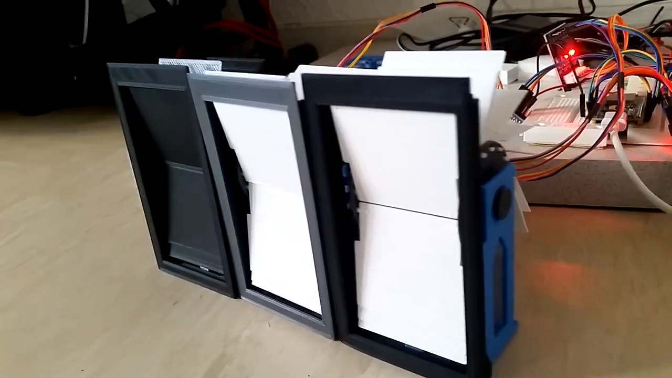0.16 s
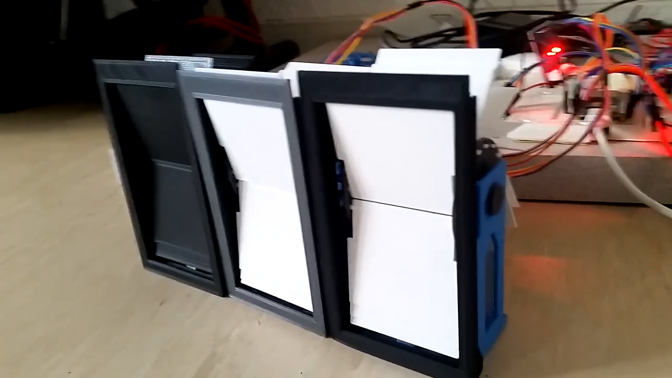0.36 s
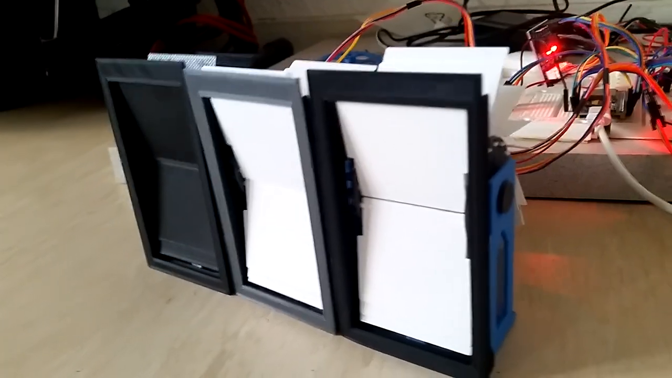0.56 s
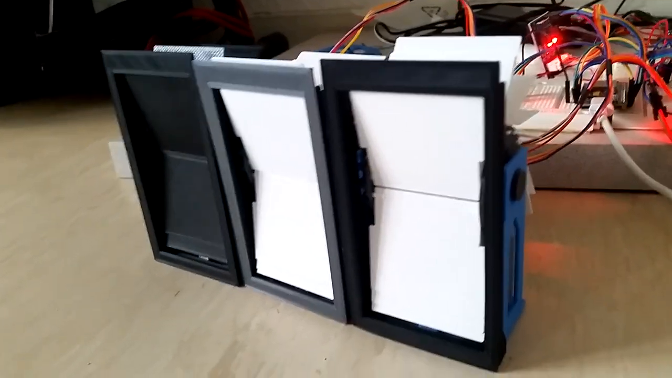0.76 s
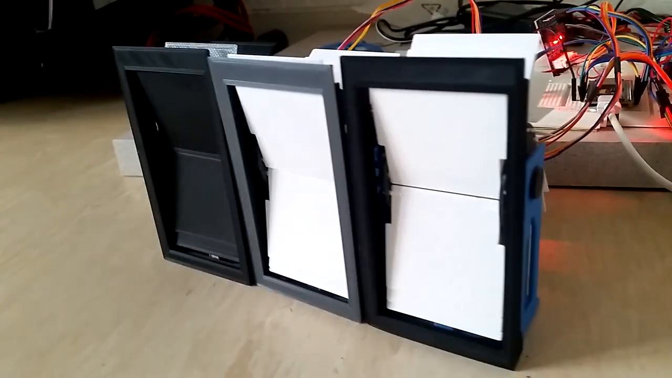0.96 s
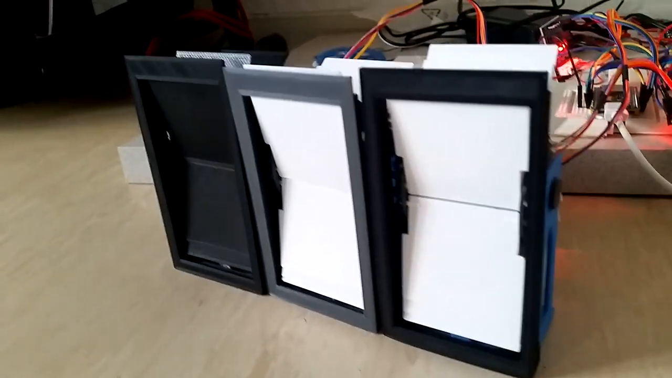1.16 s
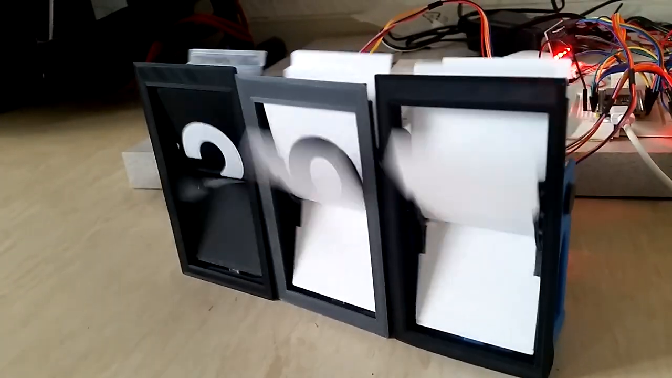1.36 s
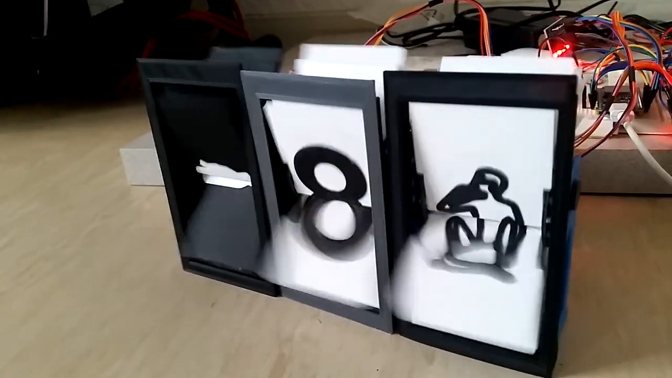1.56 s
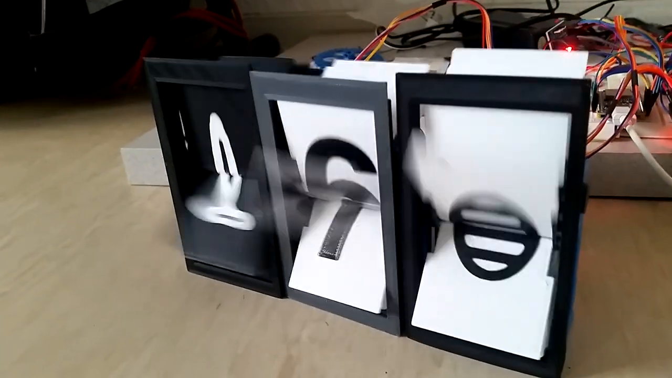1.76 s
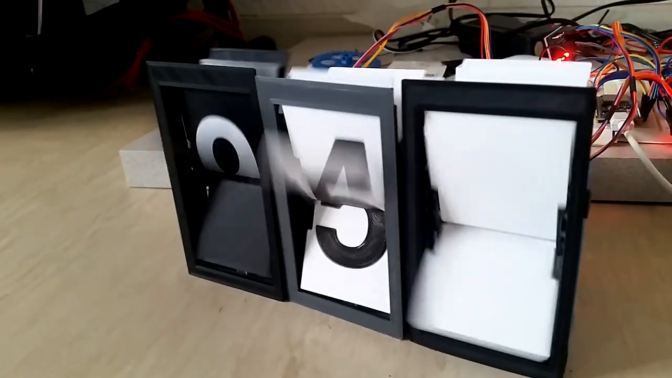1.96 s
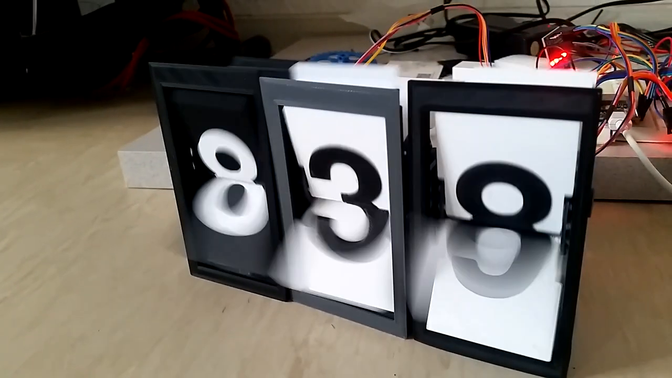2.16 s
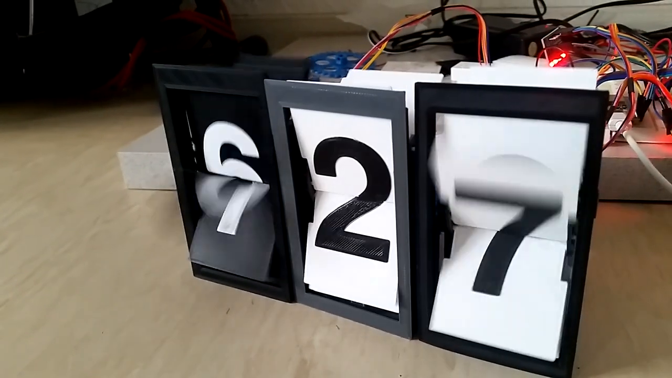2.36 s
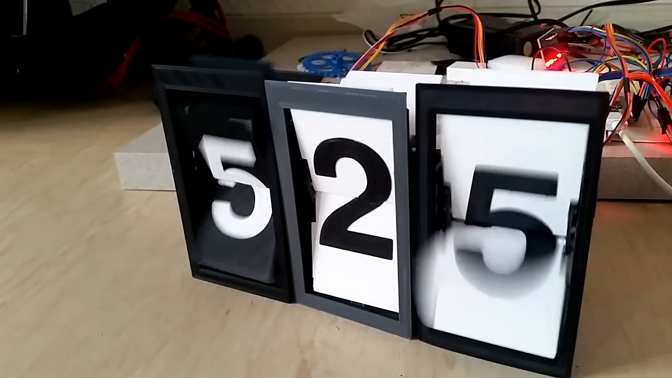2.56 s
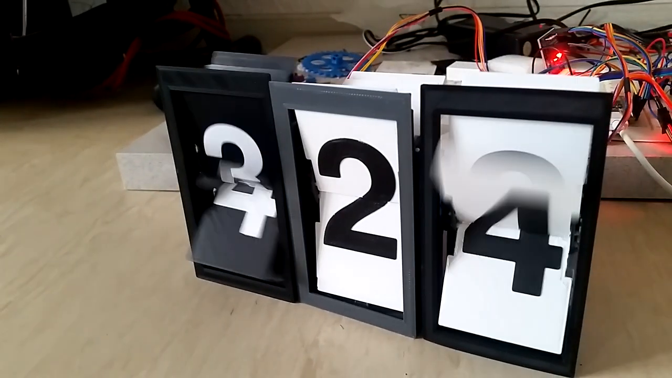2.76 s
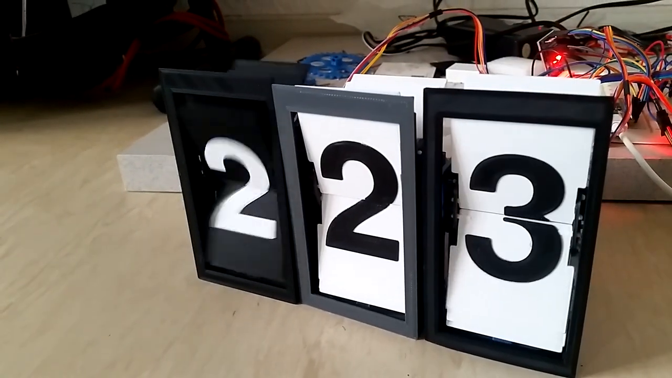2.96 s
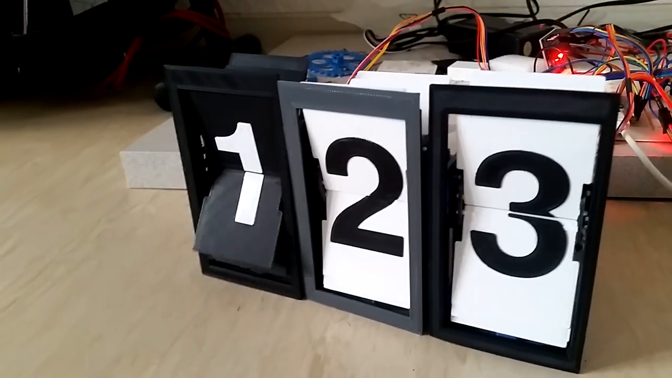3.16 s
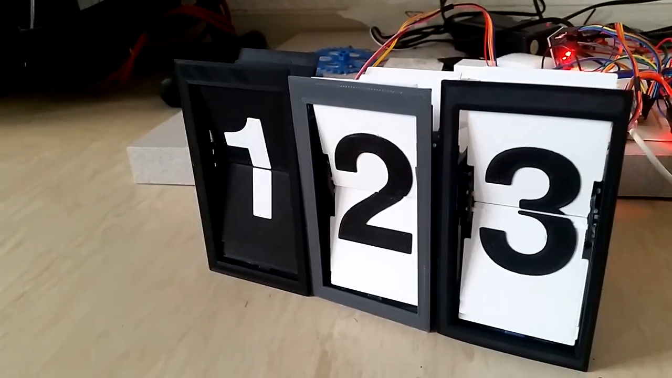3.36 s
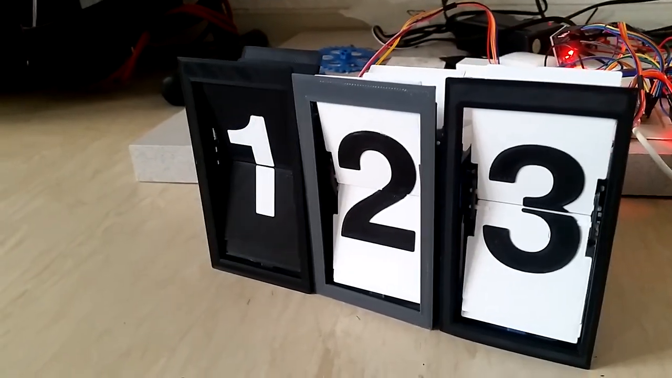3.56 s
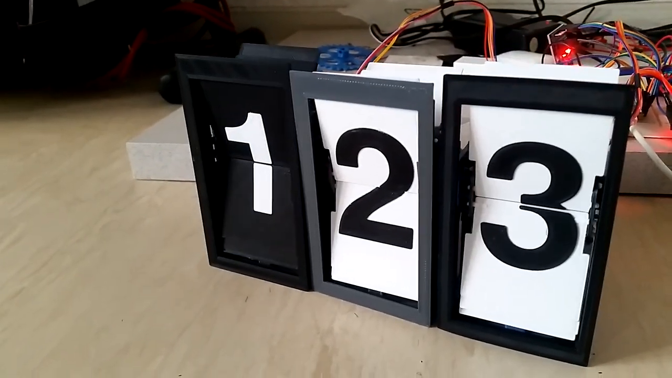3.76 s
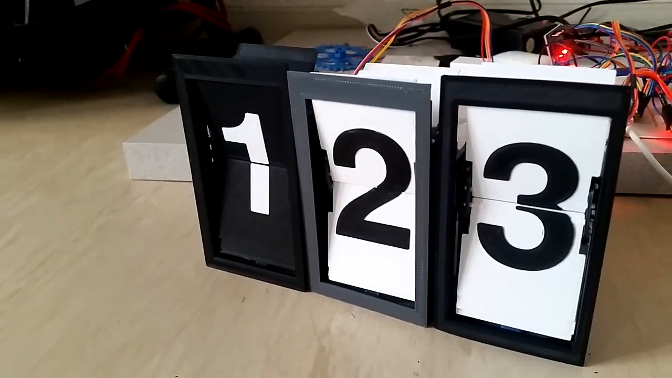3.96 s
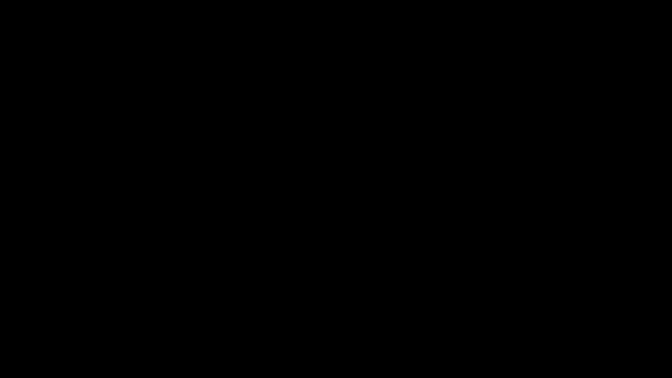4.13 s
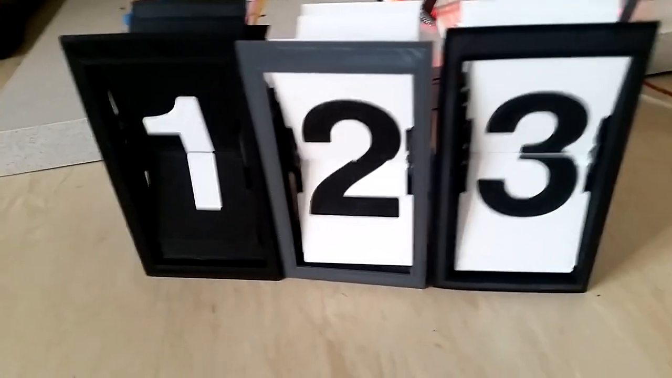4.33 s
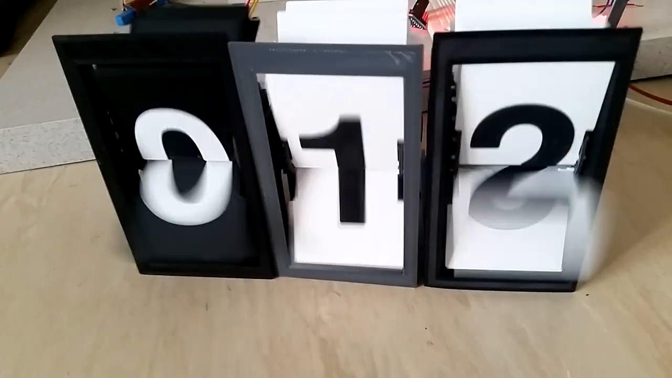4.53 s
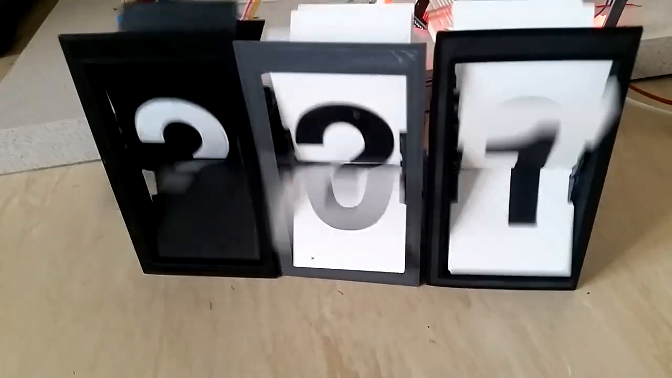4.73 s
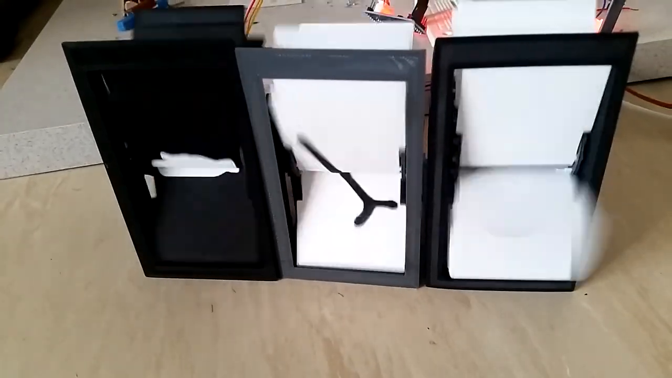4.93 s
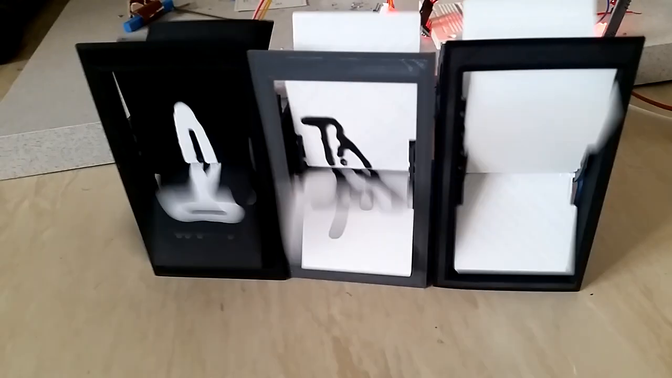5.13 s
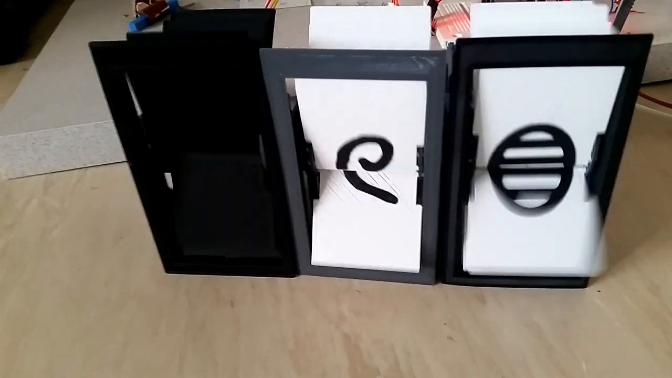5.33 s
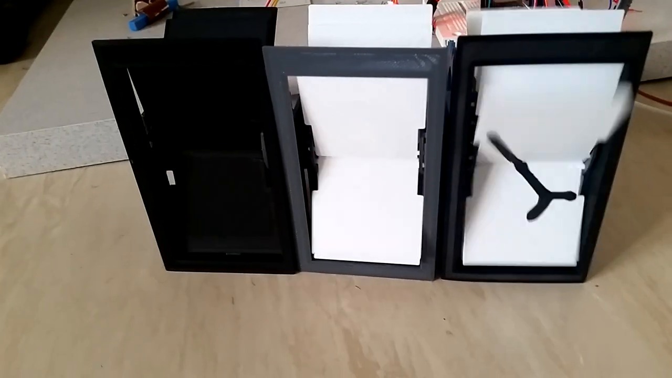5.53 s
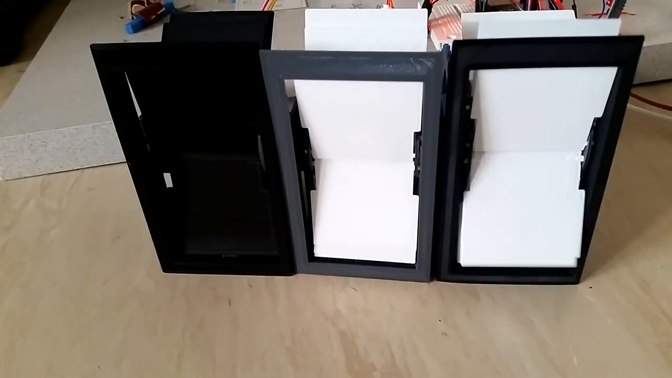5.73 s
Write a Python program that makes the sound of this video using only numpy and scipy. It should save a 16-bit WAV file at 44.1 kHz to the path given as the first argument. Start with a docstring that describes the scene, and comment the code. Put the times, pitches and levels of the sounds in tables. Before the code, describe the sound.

After a quiet low hum, small motor-driven display cards clatter down fast, thin out and stop, rest briefly, then clatter again.

```python
"""A low hum over faint rumble and hiss precedes three small split-flap modules, close by in a small room.
Their geared motors start together: filtered noise whirrs, and a moment later plastic cards land as bursts of tiny
contacts that excite resonances, rebound and chatter to rest, while loose cards rub and tick. The motors stop one
by one. The hum remains through a pause with faint touches and, near its end, a dull blip of four decaying tones;
then the cards run a second time. Diffuse, decaying noise reflections follow the sounds of the display."""
import sys
import numpy as np
from scipy import signal
from scipy.fft import rfft, irfft
from scipy.io import wavfile

SR = 44100
rng = np.random.default_rng(int(sys.argv[2]) if len(sys.argv) > 2 else 0)


def dump(signal):
    """Clip the signal to [-1, 1] and save it as 16-bit WAV at the path in sys.argv[1]."""
    limited = np.clip(np.atleast_2d(signal).T, -1, 1)
    pcm = np.round(limited * 32767).astype(np.int16)
    wavfile.write(sys.argv[1], SR, pcm)


N = 255339
T = np.arange(N) / SR  # time / s

# spectrum of rumble and hiss: f/Hz, relative density/dB per Hz
AIR_SPECTRUM = [(20, -8.5), (78, 1), (125, -13), (160, -12), (330, -23), (700, -29.5), (1400, -35.5),
                (2500, -39.5), (3500, -37), (6400, -40.5), (8000, -38), (13800, -38.5), (15100, -32)]
# side gain of the hiss, growing where each capsule hisses on its own: f/Hz, gain/dB
AIR_SIDE_GAIN = [(110, -21), (400, -8), (1200, -1.5), (6000, -0.5), (10000, -10)]
# course of the low hum: t/s, rms level/dB
HUM_LEVEL = [(0, -73), (.18, -55.5), (.56, -65.5), (.7, -56.5), (.86, -57.5), (.95, -65), (3.4, -67.5),
             (3.65, -60), (4.15, -66), (4.32, -64)]
# faint handling ticks while the display rests: t/s, level/dB, centre f/Hz
TOUCHES = [(1.152, -56, 8950), (3.667, -66, 1800), (3.851, -63, 4000), (4.256, -59.5, 9000)]
# inharmonic tones of the faint blip: f/Hz, relative level/dB, undamped t60/s
BLIP_TONES = [(520, 0, 0.082), (743, -1, .11), (887, -4, 0.083), (1130, -4, .14)]
# reverberation time of the room: f/Hz, t60/s
ROOM_T60 = [(100, 0.8), (500, 0.33), (14000, 0.2)]
# colour of the reflections: f/Hz, relative level/dB
ROOM_COLOUR = [(100, 4), (1500, 7.6), (5000, 0.6), (15000, 6.5)]
# side gain, the share of left-right difference: f/Hz, gain/dB
SIDE_GAIN = [(60, -30.5), (650, -24.5), (1400, -14), (1900, -10.5), (2900, -9.5), (4700, -8.5), (6200, -3),
             (8500, -5), (11500, -4.5)]
# resonances of flaps and frames: f/Hz, bandwidth/Hz, relative level/dB
FLAP_MODES = [(1803, 260, -11.5), (2470, 160, -7.5), (2830, 390, -6.5), (4250, 200, 2.5), (4080, 160, -5),
              (5136, 170, -.5), (5660, 170, -11), (8430, 220, -.5), (11100, 650, -8)]
# turns of the drums, three modules a run: start t/s, stop t/s, relative level/dB
TURNS = [(1.275, 2.416, 1), (1.276, 3.05, 1), (1.279, 3.19, -7), (4.347, 5.27, 2), (4.337, 5.52, -1.5),
         (4.336, 5.687, -9.5)]
# spectral weighting of the gear whirr: f/Hz, gain/dB
WHIRR_COLOUR = [(40, -19.5), (120, 5.5), (450, -1.5), (1200, 1), (2500, 4.5), (3400, 3.5), (4400, 4),
                (5600, 3.5), (7400, -3), (11800, -3.5), (15800, -7.5)]
# spectral weighting of the card rattle: f/Hz, gain/dB
RATTLE_COLOUR = [(40, -20.5), (120, -4), (300, 0), (1200, -0.5), (2200, 0.5), (5500, 8), (7500, 2),
                 (15800, -7.5)]
# spectral weighting of a slap: f/Hz, gain/dB
SLAP_COLOUR = [(40, -6), (120, -4.5), (300, -8), (1300, -5), (2600, 0.5), (3500, -1), (5000, 2.5),
               (7200, -1.5), (12500, -1), (15800, -4)]
# clearest ticks of flaps slipping off their catch or settling: t/s, level before trim/dB
TICKS = [(1.301, -34), (1.3753, -26), (1.5216, -27), (1.5688, -24), (1.6213, -17.5), (1.738, -27),
         (1.7557, -23.5), (1.7818, -21), (1.8556, -17), (1.906, -18), (1.929, -25), (1.9867, -22.5),
         (2.0015, -20.5), (2.0824, -26), (2.1576, -20.5), (2.2126, -24.5), (2.2824, -22.5), (2.331, -32),
         (2.3541, -26), (2.372, -17), (2.4705, -26.5), (2.523, -28), (2.5991, -25.5), (2.6145, -25),
         (2.6596, -25), (2.6776, -22.5), (2.716, -30), (2.743, -23.5), (2.7806, -30), (2.852, -25),
         (2.8948, -25), (2.904, -23), (2.9556, -20), (3.023, -33), (3.1524, -29.5), (3.2856, -29.5),
         (3.3212, -29), (3.326, -35), (3.3904, -51), (3.4124, -48.5), (4.385, -31), (4.4258, -23.5),
         (4.472, -31), (4.507, -33.5), (4.5496, -23), (4.6396, -24.5), (4.6671, -20), (4.7594, -21),
         (4.807, -30), (4.899, -23.5), (4.9115, -24), (4.926, -21.5), (4.9937, -24), (5.039, -36),
         (5.061, -29), (5.0694, -17), (5.1166, -35), (5.234, -26), (5.4107, -28), (5.4216, -27),
         (5.4579, -23.5), (5.4815, -24), (5.508, -24), (5.6321, -34), (5.6563, -24), (5.7558, -32.5),
         (5.783, -46)]
# landings: t/s, level before trim/dB, body below 3.3 kHz/dB, snap above 7 kHz/dB, chatter decay/s,
# lean from the 4.2 kHz to the 5.2 kHz ring/dB; body and snap are relative to the band between
LANDINGS = [(1.509, -17, -5, -3.5, 0.004, -3), (1.534, -15.5, -2.5, -0.5, .003, -7),
            (1.554, -12, -11, -2, 0.0037, 9), (1.6359, -13, -6, 2, 0.0066, 6),
            (1.6634, -13, -8, 2, 0.004, -3), (1.6743, -11.5, -3.5, 10, 0.0033, -4),
            (1.769, -13, -7, -6, 0.0032, -7), (1.7916, -12.5, -10, -5, 0.0029, 5),
            (1.799, -14, -11.5, -2.5, .0022, -12), (1.8693, -10.5, -7, 4, 0.0082, -6),
            (1.912, -12, -5.5, 3, 0.007, -8), (1.9503, -11, -14.5, -1.5, 0.0034, -1),
            (2.0276, -15, -3.5, 3, 0.0064, -1), (2.0439, -11.5, -11, -5, .0057, 1),
            (2.0692, -15, -8.5, -3.5, 0.0017, 3), (2.123, -16, -4.5, 7, 0.0025, 1),
            (2.1334, -11.5, -6, 2.5, 0.0071, -2), (2.1844, -16, -7, -6, 0.0063, 1),
            (2.2625, -14.5, -6.5, -5, 0.0094, 3), (2.2692, -14.5, -2, 6.5, 0.0015, -1),
            (2.298, -14, -3, 6, 0.0038, -3), (2.3408, -20.5, -23, 4, 0.0017, 10),
            (2.3817, -15, -6.5, -3.5, 0.01, 4), (2.4035, -12.5, -3, 3, .0084, -1),
            (2.4236, -16.5, -6, 0.5, 0.0038, 1), (2.4983, -14.5, -6.5, 2.5, .007, -4),
            (2.555, -15, -2.5, -4, .0026, 2), (2.628, -16.5, -8.5, -7, .0077, 5),
            (2.6878, -13, -5, 3.5, 0.0038, -13), (2.7642, -16.5, -6.5, -1.5, 0.0043, 13),
            (2.8018, -20, -4, -2.5, .0026, 4), (2.917, -18, -8, -2.5, 0.012, 10),
            (2.946, -20.5, 1.5, 1, 0.002, 5), (3.0465, -13.5, -6, 2, .0055, -4),
            (3.1775, -18, -3, 2, 0.0048, 3), (4.56, -11, -11, 1, .003, -6),
            (4.5815, -17.5, -6, -6, 0.0047, 1), (4.6059, -14.5, -5, 3, .003, -4),
            (4.6896, -16.5, -2.5, 2, 0.0088, -16), (4.73, -13, -6.5, 6.5, 0.0023, -16),
            (4.736, -11.5, -4, 5, 0.0077, -1), (4.815, -11, -4, 6.5, 0.0063, -6),
            (4.825, -15.5, -2.5, 0.5, .002, -11), (4.868, -15, -8.5, -1.5, 0.0026, -5),
            (4.946, -10.5, -7.5, 0.5, 0.0084, -8), (4.9989, -11.5, -9, -2.2, 0.0049, 3),
            (5.08, -8, -8.5, 1.5, 0.0037, -5), (5.1554, -14.5, -9, -4.5, .0055, -11),
            (5.1811, -19, -1.5, 3, .009, 0), (5.197, -12.5, -6, -1.5, 0.0041, -11),
            (5.2072, -11, -11, -1, .004, 0), (5.2624, -12, -6.5, 4.5, 0.013, 1),
            (5.3325, -12, -10, 0.5, .0055, 2), (5.3463, -15.5, -1, 7, 0.0024, 1),
            (5.3814, -12, -10, -1, 0.002, 17), (5.5186, -13.5, -5.5, 2.5, 0.0025, 5),
            (5.5475, -12.5, -9.5, -2.5, 0.0041, -2), (5.6735, -16, -7.5, 0.7, 0.0044, -7)]

AIR_DB = -60
HUM_HZ = 106
BLIP_S, BLIP_DB = 4.219, -50
SPIN_UP_S, RUN_DOWN_S = 0.022, 0.029
# levels before the common trim of the drums; cards join in once the slack is taken up
GEARS_DB, CARDS_DB, SLACK_S = -44.5, -42, 0.21
# the gears strain once for every card: period, first peak after the start, swing either way
CARD_S, STRAIN_AT_S, STRAIN_DB = .129, .024, 2
# random catching and letting go of the rubbing: rms swing, fastest rate
CATCH_DB, CATCH_HZ = 2.5, 70
# swell of the other cards after a landing: level relative to its table level, decay
JOSTLE_DB, JOSTLE_S = -23, 0.019
# faint ticks of loose cards in each drum: rate, level before trim, greatest deviation
LOOSE_PER_S, LOOSE_DB, LOOSE_SPREAD_DB = 11, -37, 1
TICK_DECAY_S = 0.0034
DETUNE = .06  # greatest shift of a resonance, as a share of its frequency
LEAD_S = .012  # time before landing at which the sound of a hit begins
# single rebound: base delay, scale of its random share, strength
REBOUND_S, REBOUND_SPREAD, REBOUND_DB = .004, 0.38, -9.5
CUTOFF_HZ = 15750


def from_db(db):
    """Level law: decibels to amplitude gain."""
    return 10 ** (np.asarray(db) / 20)


def rms_one(x):
    """Normalization to unit root mean square."""
    return x / np.sqrt(np.mean(x ** 2) + 1e-20)


def at_hz(points, hz):
    """Interpolation of a spectrum along a logarithmic frequency axis."""
    f, value = np.transpose(points)
    return np.interp(np.log(np.maximum(hz, 1)), np.log(f), value)


def cut(x, hz, kind, order=2):
    """Band limitation by a Butterworth filter."""
    return signal.sosfilt(signal.butter(order, hz, kind, fs=SR, output="sos"), x)


def colour(x, spectrum, size=2048):
    """Minimum-phase filtering: the folded cepstrum gives a causal response with the given spectrum."""
    gain = from_db(at_hz(spectrum, np.arange(size // 2 + 1) * SR / size))
    cepstrum = irfft(np.log(gain))
    fold = np.r_[1, np.full(size // 2 - 1, 2), np.zeros(size // 2)]
    response = irfft(np.exp(rfft(cepstrum * fold)))
    return signal.fftconvolve(x, response[None], axes=-1)[:, :x.shape[-1]]


def add(out, s, sound):
    """Superposition: mix a sound in at time s."""
    i = int(np.clip(s * SR, 0, N - 1))
    out[:, i:i + sound.shape[1]] += sound[:, :N - i]


def background():
    """Stationary noise, shaped as rumble and hiss, with two tones of hum that waver in frequency together."""
    air = colour(rng.standard_normal((2, N)), AIR_SPECTRUM, size=8192)
    air[1:] = colour(air[1:], AIR_SIDE_GAIN)
    waver_hz = 3.2 * rms_one(cut(rng.standard_normal(N), 5.5, "low"))
    hum_db = np.interp(T, *np.transpose(HUM_LEVEL))
    phase = 2 * np.pi * np.cumsum(HUM_HZ + waver_hz) / SR
    upper_phase = 2 * np.pi * np.cumsum(200 + waver_hz) / SR
    hum = from_db(hum_db) * np.sqrt(2) * np.sin(phase)
    upper_hum = from_db(hum_db - 17.0) * np.sin(upper_phase)
    # the hum is in the middle only
    return from_db(AIR_DB) * air / np.std(air[0]) + np.outer([1, 0], hum + upper_hum)


def handling(decay_s=0.0041):
    """Transient friction: each faint touch is an exponentially decaying puff of noise an octave wide."""
    out = np.zeros((1, N))
    for s, db, hz in TOUCHES:
        band = [hz / np.sqrt(2), hz * np.sqrt(2)]
        noise = rms_one(cut(rng.standard_normal((1, N)), band, "band"))
        add(out, s, from_db(db) * noise * np.exp(-np.minimum(T, 1) / decay_s))
    return out[0]


def blip(damp_s=0.022):
    """Additive synthesis: a faint, dull blip of four inharmonic decaying tones that stops short."""
    t = np.maximum(T - BLIP_S, 0)
    tones = 0
    for hz, db, t60 in BLIP_TONES:
        tones = tones + from_db(db - 60 * t / t60) * np.sin(2 * np.pi * hz * t)
    soft_onset = 1 - np.exp(-t / 0.0033)
    return from_db(BLIP_DB) * tones * soft_onset * np.exp(-(t / damp_s) ** 6)


def room(x, wet_db=-12, build_s=0.00035, size=16000, count=19):
    """Diffuse reverberation: noise reflections build up, then decay exponentially at each band's own rate.

    Their pattern changes as the microphone is carried about.
    """
    t, edges = np.arange(size) / SR, np.geomspace(45, 17000, 10)
    tails = 0
    for low, high in zip(edges, edges[1:]):
        hz = np.sqrt(low * high)
        noise = cut(rng.standard_normal((count, 2, size)), [low, high], "band")
        decay_db = at_hz(ROOM_COLOUR, hz) - 60 * t / at_hz(ROOM_T60, hz)
        tails = tails + noise * from_db(decay_db)
    tails = rms_one(tails * (1 - np.exp(-(t / build_s) ** 2))) / np.sqrt(size)
    # the cards throw a different sound in each direction, so left and right have their own reflections
    thrown = np.array([x[0] + x[1], x[0] - x[1]]) / np.sqrt(2)
    place, out = np.linspace(0, count - 1, N), 0
    for k, tail in enumerate(tails):
        nearness = np.sqrt(np.clip(1 - np.abs(place - k), 0, 1))  # equal-power crossfade
        out = out + signal.oaconvolve(thrown * nearness, tail, axes=-1)[:, :N]
    side = from_db(4.5) * colour(out[:1] - out[1:], SIDE_GAIN)
    return from_db(wet_db) * np.array([out[0] + out[1], side[0]])


def plastic(x, ring_db, scatter_db=0, detune=0, upper_db=0):
    """Resonance: a contact is heard with the modes it excites; where it strikes favours 4.2 or 5.2 kHz."""
    out = x.copy()
    for hz, width_hz, db in FLAP_MODES:
        strength, shift = rng.uniform(-1, 1, 2)
        r = np.exp(-np.pi * width_hz / SR)
        w = 2 * np.pi * hz * (1 + detune * shift) / SR
        ringing = rms_one(signal.lfilter([1, 0, -1], [1, -2 * r * np.cos(w), r * r], x + 1e-18))
        main_ring = 3500 < hz < 6500
        lean_db = np.sign(hz - 4700) * upper_db / 2 if main_ring else scatter_db * strength
        excitation = np.std(x) * np.sqrt(np.pi * width_hz / SR)
        out += from_db(db + ring_db + lean_db) * ringing * excitation
    return out


def turning(delay_s):
    """Incoherent addition: the powers of all turning drums are summed, from a delay after each start."""
    power = np.zeros(N)
    for start, stop, db in TURNS:
        spin_up = np.clip((T - start - delay_s) / SPIN_UP_S, 0, 1)
        run_down = np.clip(1 - (T - stop) / RUN_DOWN_S, 0, 1)
        power += (spin_up * run_down * from_db(db)) ** 2
    return np.sqrt(power)


def strain():
    """Periodic loading: the gear level swells as each card is bent against its catch."""
    started = np.max([start * (T >= start) for start, *_ in TURNS], axis=0)
    return from_db(STRAIN_DB * np.cos(2 * np.pi * (T - started - STRAIN_AT_S) / CARD_S))


def jostle():
    """Impulsive excitation: each landing shakes the other cards, whose response decays exponentially."""
    shakes = np.zeros(N)
    for s, db, *_ in LANDINGS:
        shakes[int(s * SR)] += from_db(db + JOSTLE_DB) ** 2
    return np.sqrt(signal.lfilter([1], [1, -np.exp(-2 / (JOSTLE_S * SR))], shakes + 1e-18))


def rattle(spectrum, ring_db, tooth_db, teeth_per_s, tooth_s, count=3):
    """Stick-slip friction: uneven rubbing and short bursts excite each module's own modes; rms 1."""
    rubbing = plastic(rng.standard_normal((2, N)), ring_db=ring_db)
    teeth = 0
    for module in range(count):
        touched = rng.random(N) < teeth_per_s / count / SR
        touches = touched * from_db(rng.uniform(-12, 0, N))
        bursts = signal.lfilter([1], [1, -np.exp(-1 / (tooth_s * SR))], touches + 1e-18)
        teeth = teeth + plastic(bursts * rng.standard_normal((2, N)), ring_db=ring_db, detune=DETUNE)
    catching = from_db(CATCH_DB * rms_one(cut(rng.standard_normal(N), CATCH_HZ, "low")))
    x = colour(catching * (rms_one(rubbing) + from_db(tooth_db) * rms_one(teeth)), spectrum)
    x[1:] = colour(x[1:], SIDE_GAIN)
    return rms_one(x)


def drums(drums_db=-3):
    """Friction noise: gears whirr while the drums turn, and card edges rub and rattle over them."""
    whirr = rattle(WHIRR_COLOUR, ring_db=-12, tooth_db=-0.5, teeth_per_s=290, tooth_s=0.002)
    gears = from_db(GEARS_DB) * turning(0) * strain() * whirr
    cards_gain = np.hypot(from_db(CARDS_DB) * turning(SLACK_S), jostle())
    cards = cards_gain * rattle(RATTLE_COLOUR, ring_db=-1, tooth_db=6.5, teeth_per_s=130, tooth_s=0.0012)
    return from_db(drums_db) * (gears + cards)


def grains(size, per_s, spread_db):
    """Shot noise: mid and side trains of tiny contacts at random moments, of uneven strength."""
    born = rng.random(size) < per_s / SR
    strength = from_db(spread_db * np.clip(rng.standard_normal(size), -2, 2))
    return rms_one(born * strength * rng.standard_normal((2, size)))


def hit(level_db, body_db, snap_db, decay_s, brush_db, rebound_db, upper_db, crack_db=-13.0,
        crack_s=0.00073, brush_s=0.0046, rebound_decay_s=0.0019, scatter_db=-19, scatter_s=0.011, size=2560):
    """Impact: a flap brushes its neighbour, cracks down, rebounds and chatters; frames and table scatter it.

    The level refers the energy of the hit to a span of 5 ms.
    """
    t = np.arange(size) / SR - LEAD_S
    after = np.maximum(t, 0)
    crack = from_db(crack_db) * np.exp(-after / crack_s)
    chatter = np.exp(-after / decay_s)
    scattered = from_db(scatter_db) * np.exp(-after / scatter_s)
    since_rebound = t - REBOUND_S * (1 + REBOUND_SPREAD * rng.uniform(-1.1, 1))
    rebound_decay = np.exp(-np.abs(since_rebound) / rebound_decay_s)
    rebound = from_db(rebound_db) * (since_rebound > 0) * rebound_decay
    brush = from_db(brush_db) * np.exp(-np.abs(t) / brush_s)
    envelope = np.where(t < 0, brush, crack + chatter + scattered + rebound)
    contact = grains(size, per_s=16000, spread_db=3) * envelope
    ringing = plastic(contact, ring_db=4.0, scatter_db=4, detune=DETUNE, upper_db=upper_db)
    x = colour(ringing, SLAP_COLOUR, size=1024)
    x[1:] = colour(x[1:], SIDE_GAIN, size=256)
    x[1] += rng.normal(0, 0.03) * x[0]  # each hit leans a little to the left or right at random
    # where the card strikes sets the balance of body, clack and snap
    low_hz, high_hz, span_s = 3300, 7000, .005
    body, rest = (cut(cut(x, low_hz, kind), low_hz, kind) for kind in ("low", "high"))
    clack, snap = (cut(cut(rest, high_hz, kind), high_hz, kind) for kind in ("low", "high"))
    x = from_db(body_db) * rms_one(body) + rms_one(clack) + from_db(snap_db) * rms_one(snap)
    return from_db(level_db) * rms_one(x) * np.sqrt(span_s * SR / size / 2)


def ticks(tick_db=-2.0, brush_db=-24, body_db=-7, rebound_db=-20, count=24):
    """Light impacts: the clear ticks, and faint ones at uneven intervals while a drum turns."""
    moments = list(TICKS)
    for start, stop, drum_db in TURNS:
        for k, (place, strength) in enumerate(rng.uniform(-1, 1, (count, 2))):
            s = start + SLACK_S + (k + .5 + .5 * place) / LOOSE_PER_S
            if s < stop:
                moments.append((s, LOOSE_DB + drum_db + LOOSE_SPREAD_DB * strength))
    out = np.zeros((2, N))
    for s, db in moments:
        snap_db, upper_db = rng.normal(0, 4), rng.normal(1, 5)
        tick = hit(db + tick_db, body_db, snap_db, TICK_DECAY_S, brush_db, rebound_db, upper_db)
        add(out, s - LEAD_S, tick)
    return out


def flaps(slap_db=1.31, brush_db=-14):
    """Superposed impacts: every landing of a flap, as mid and side."""
    out = np.zeros((2, N))
    for s, db, body_db, snap_db, decay_s, upper_db in LANDINGS:
        rub_db = brush_db + rng.uniform(-4, 4)
        slap = hit(db + slap_db, body_db, snap_db, max(decay_s, 1e-3), rub_db, REBOUND_DB, upper_db)
        add(out, s - LEAD_S, slap)
    return out


def scene(pan_db=-.25):
    """Direct plus reverberant sound of the display over the background, all slightly to the right."""
    still = background() + np.outer([1, 0], blip() + handling())
    display = drums() + ticks() + flaps()
    mid, side = display + room(display) + still
    return np.array([mid + side, mid - side]) * from_db([[pan_db], [-pan_db]])


def record(dry):
    """Limiting and band limitation: peaks are clipped at full scale, then the treble ends steeply."""
    lowpass = signal.ellip(10, .1, 70, CUTOFF_HZ, fs=SR, output="sos")
    return signal.sosfilt(lowpass, np.clip(dry, -1, 1))


dry = scene()
out = record(dry)
dump(out)
```